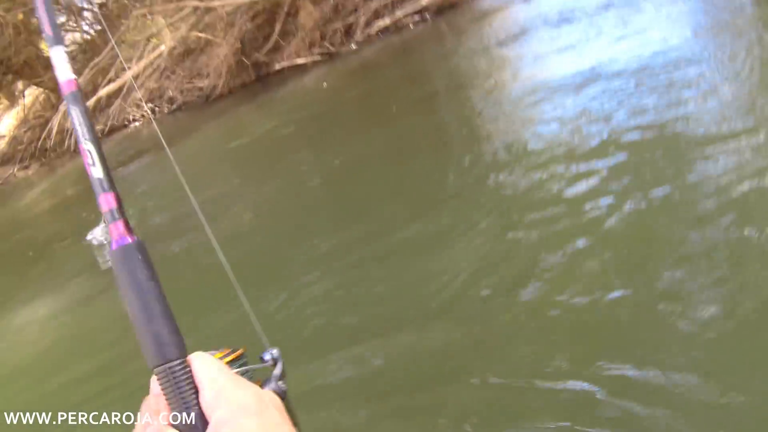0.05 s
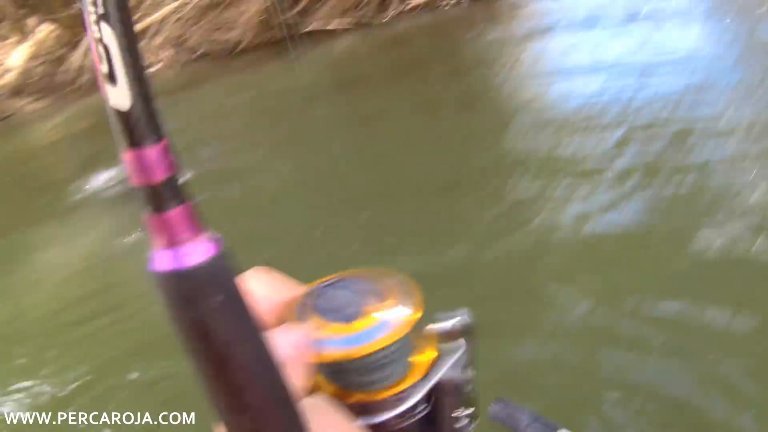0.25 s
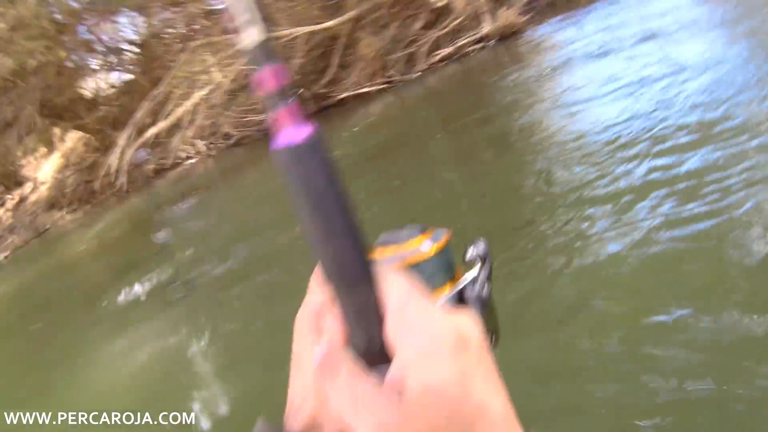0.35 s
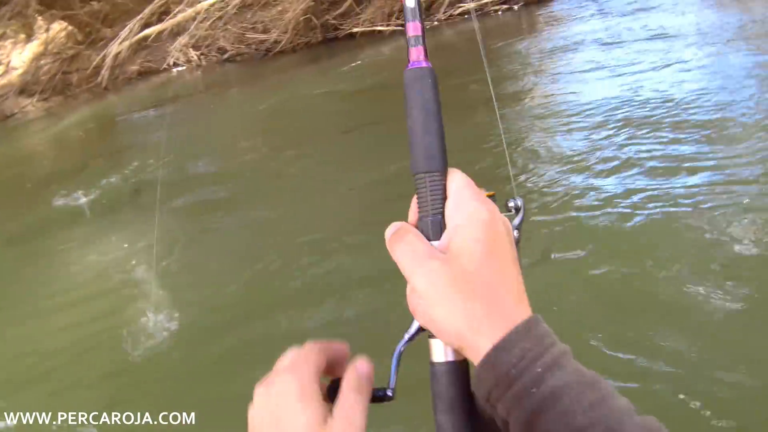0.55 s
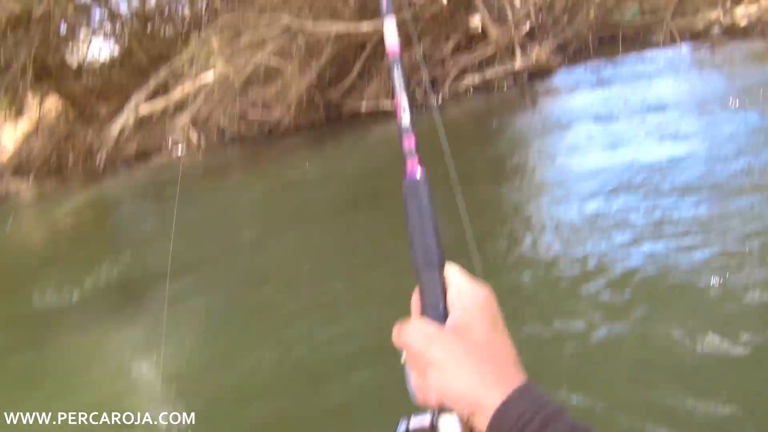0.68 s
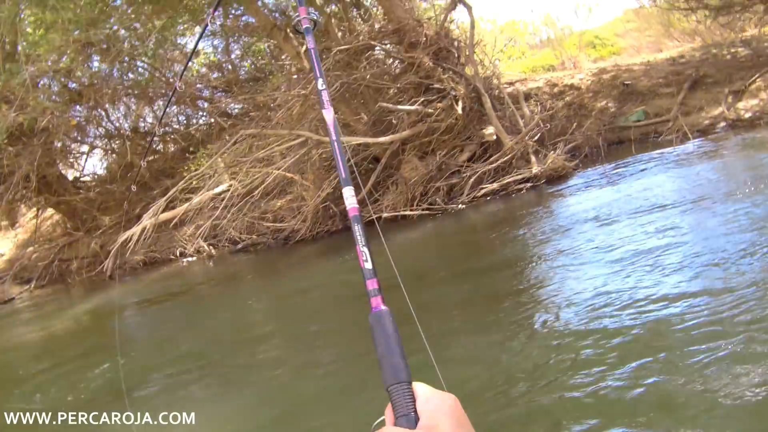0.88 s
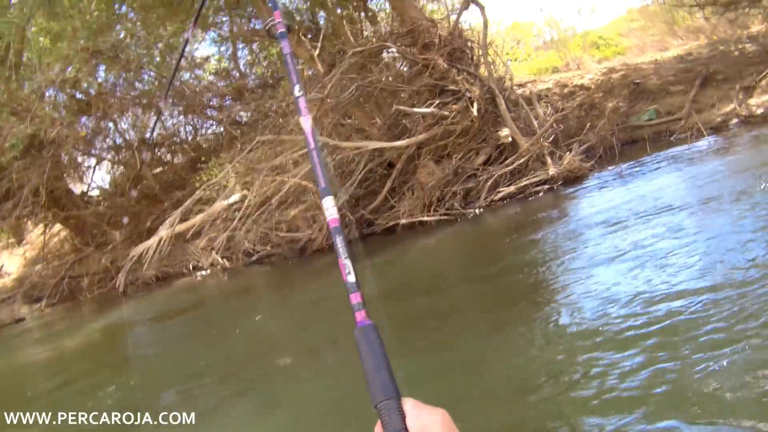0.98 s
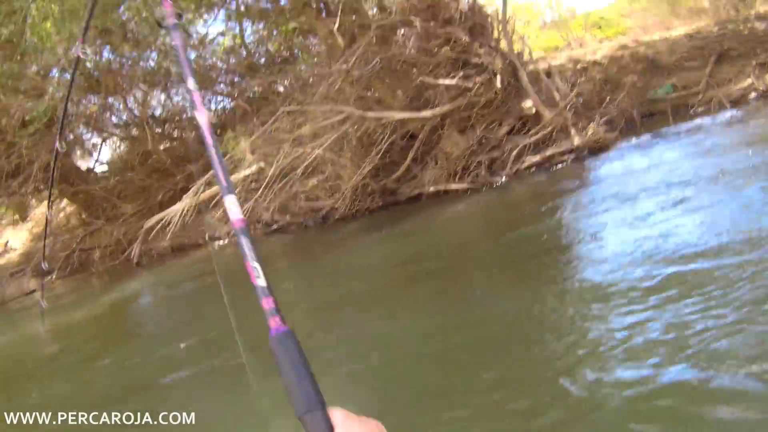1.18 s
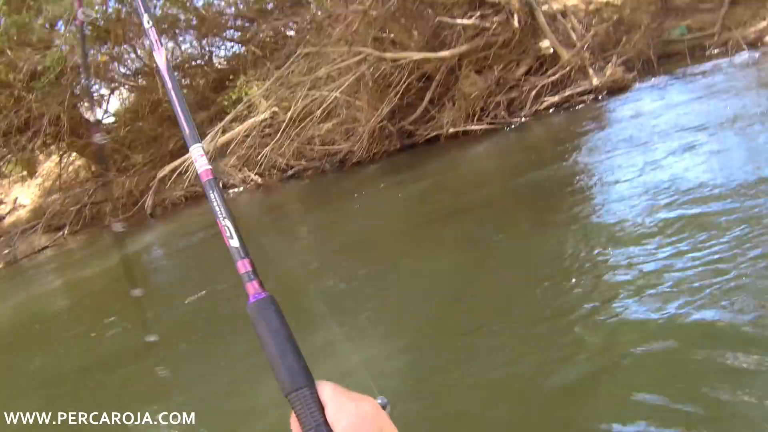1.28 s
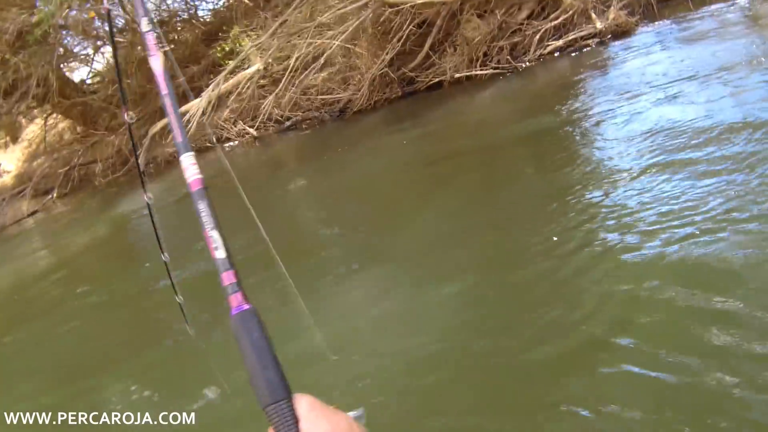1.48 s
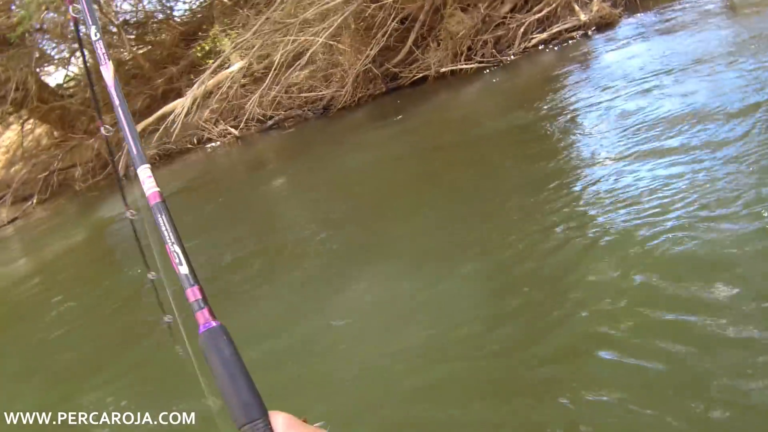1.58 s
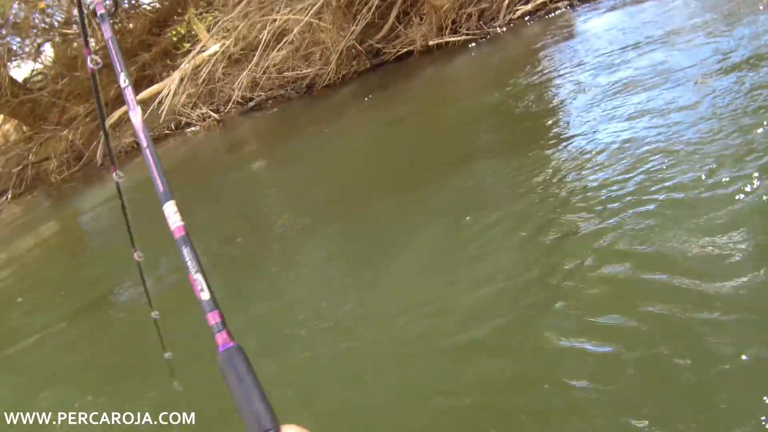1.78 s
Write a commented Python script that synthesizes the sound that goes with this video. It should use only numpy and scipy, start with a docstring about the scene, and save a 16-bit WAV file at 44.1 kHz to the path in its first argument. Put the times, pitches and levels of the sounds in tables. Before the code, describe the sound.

Close by on a river bank, a fishing rod cracks loudly and splinters. Much quieter clicks follow as the dangling tip knocks against the rod, ending with a dull handling bump, all over a soft hiss of water.

```python
"""A slow river hisses softly and a sleeve rustles as a bent fishing rod is raised, an arm's length from
the microphone of a small camera whose case rings near 5.7 kHz. A few fibres give, then the shaft cracks
and splinters; the water and the overgrown bank throw the crack back. The dangling tip clacks and ticks
against the rod, slack line scrapes, a steel guide pings and a hand bumps the grip."""
import sys
import numpy as np
from scipy import signal
from scipy.fft import rfft, irfft
from scipy.io import wavfile

SR = 44100
rng = np.random.default_rng(int(sys.argv[2]) if len(sys.argv) > 2 else 0)


def file_out(sig):
    """Save sig as 16-bit WAV at sys.argv[1]."""
    # one column per channel
    cols = np.atleast_2d(sig).T
    # limit, then scale
    lim = np.clip(cols, -1, 1)
    pcm = np.round(lim * 32767).astype(np.int16)
    wavfile.write(sys.argv[1], SR, pcm)


N = 81585

# river hiss heard through the camera case, which resonates near 5.7 kHz: f/Hz, relative level/dB
RIVER_IN_CASE = [(25, -4.5), (45, -8.5), (70, -7), (100, -11.5), (135, -13.5), (200, -14.5), (320, -12.5),
                 (550, -15.5), (800, -18), (1400, -20), (2100, -22), (3500, -27), (4300, -22.5),
                 (5100, -14.5), (5730, -10), (6500, -18.5), (7300, -27), (8600, -36), (11000, -42.5),
                 (16000, -59)]
RIVER_DB, RIPPLE_DB, RIPPLES_PER_S = -65, 1.2, 30
# air buffeting the moving camera: t/s, level/dB, half length/s
AIR_PUFFS = [(0.102, -59, 0.023), (0.323, -58, 0.078), (0.48, -64.5, 0.0193), (1.593, -64, 0.033),
             (1.681, -63.5, 0.053)]
# its rumble on the microphone: f/Hz, relative level/dB
WIND_COLOUR = [(20, 4), (90, -1), (150, -9), (300, -26), (1000, -50), (8000, -62.5)]

# sleeve and hand, close by: f/Hz, relative level/dB
RUSTLE_COLOUR = [(60, -12), (170, -10), (300, -5), (900, -1), (2000, -5.5), (4000, -14.5), (12000, -42.5)]
RUSTLE_DB, RUSTLE_HOLD_S, RUSTLE_FADE_S = -67, .274, .15
# the hand bumping the grip: t/s, level/dB, decay/s
GRIP_BUMPS = [(1.8186, -48.5, 0.0067), (1.8246, -37, 0.0032), (1.8310, -50.5, 0.01), (1.8393, -43, 0.0086),
              (1.8440, -43, .008)]
# the dull sound of a bump: f/Hz, relative level/dB
BUMP_COLOUR = [(30, -1), (80, 4.5), (200, -6), (380, -0.5), (750, -10.5), (1300, -22.5), (3000, -26),
               (10000, -56)]

# slack line sliding along the rod: t/s, level/dB, half length/s
LINE_SCRAPES = [(0.903, -72, 0.014), (0.948, -72, 0.0084), (1.195, -70, 0.013), (1.278, -71, 0.017),
                (1.446, -67.5, 0.017)]
SCRAPE_ROUGH_DB, CATCHES_PER_S = 4.5, 87
# taps on a steel line guide: t/s, level/dB
GUIDE_PINGS = [(1.4715, -54), (1.4918, -53)]
GUIDE_HZ, GUIDE_T60_S = 6320, .06

# tip, line and guides touching the rod: t/s, level/dB, decay/s, knock above tick/dB, knock f/Hz
CONTACTS = [(0.071, -57, 0.0027, 1, 1700), (0.148, -68.5, 0.0041, 5, 1900),
            (0.3461, -53.5, 0.0018, 9, 2300), (0.398, -58, 0.002, 5.5, 2820),
            (0.5703, -58.5, 0.0014, 2, 3200), (0.6974, -69, .003, 6, 2450), (0.854, -61.5, .002, 4, 3300),
            (0.8815, -65, 0.0038, 7, 1800), (0.8880, -47, 0.0023, -7, 3350),
            (0.8901, -35, 0.0021, -6, 3300), (0.8975, -50, 0.0055, -18, 1500),
            (0.9235, -50, 0.0016, -7, 5700), (0.9498, -53, 0.0016, -6, 4700),
            (1.2611, -54, 0.0023, 2, 3400), (1.2891, -66, 0.0031, 12, 2240),
            (1.4345, -48, 0.0026, -1.5, 2000), (1.4440, -63.5, .009, -0.5, 2200),
            (1.4490, -66.5, .004, 9, 4500), (1.4707, -53, 0.0022, -1, 2500), (1.4913, -64, .003, 2, 6310),
            (1.8141, -45.5, 0.0012, 5, 2900), (1.8310, -63, 0.0075, 2, 2520)]
# the bright part of a contact, through the case: f/Hz, relative level/dB
TICK_COLOUR = [(60, -36), (300, -15), (1200, -23), (2700, -14), (3260, -10.5), (3800, -24), (4400, -9.5),
               (4900, -4), (5700, 2), (6500, -6), (7300, -18), (8300, -18.5), (11000, -27), (14000, -48.5)]
TICK_RISE_S, TICK_ECHO_DB, TICK_ECHO_DECAY_S = .00048, -23, .025
# the rod when knocked or scraped: f/Hz, relative level/dB
KNOCK_COLOUR = [(60, -37), (300, -16), (1000, -12), (1700, 3), (2300, 0.5), (3400, -2), (4500, 3),
                (7000, -19), (14000, -47)]
KNOCK_Q, KNOCK_UNPITCHED_DB = 2.7, -2
# modes of the hollow tube, struck by the broken tip: f/Hz, level/dB, t60/s
TUBE_MODES = [(347, -61.5, 0.13), (1486, -58, .035), (2350, -55.5, 0.034), (3316, -46, 0.024),
              (4390, -38.5, 0.013), (5620, -31.5, 0.025), (6040, -54, .05), (8400, -46.5, 0.016)]
CLACK_S, TUBE_RISE_S = .8908, .00032

# dull, smeared reflection off the water and the near bank: f/Hz, relative level/dB
REFLECTION_COLOUR = [(100, -4.5), (300, -4), (580, 6.5), (900, -13.5), (2000, -2), (3500, -16), (8000, -35)]
REFLECTION_LAG_S, REFLECTION_DB, REFLECTION_DECAY_S = .027, -34, .01
# scatter from the branches along the bank, through the case: f/Hz, relative level/dB
BANK_COLOUR = [(60, 1), (170, -5.5), (280, 3), (600, -5.5), (900, -5), (2000, -5.5), (3000, -9),
               (4200, -6.5), (5700, 4), (7200, -10), (10000, -22), (15000, -47.5)]
BANK_DB, BANK_RISE_S, BANK_PATCHY_DB, BANK_PATCHES_PER_S = -33.5, .007, 1.5, 350
BANK_T60_LOW_S, BANK_T60_HIGH_S, BANK_SPLIT_HZ = .36, .3, 3500

# single fibres and splinters giving way: t/s, level/dB, decay/s
FIBRE_BREAKS = [(0.2090, -41.5, 0.001), (0.2148, -23.5, .0021), (0.2279, -23.5, 0.0021),
                (0.2370, -23, .002), (0.2461, -26, 0.0014), (0.2534, -38.5, 0.0021), (0.2880, -43, 0.0029),
                (0.38, -51, 0.0018)]
# a splinter's click, ringing through the camera case near 5.7 kHz: f/Hz, relative level/dB
SPLINTER_IN_CASE = [(150, -21.5), (1000, -19), (2500, -11), (4200, -10), (5000, 1.5), (5850, 9), (6600, -8),
                    (7600, -22), (11000, -27.5), (15000, -43.5)]
# the tube walls tearing at arm's length, through the case: f/Hz, relative level/dB
TEAR_COLOUR = [(50, -37), (170, -28), (350, -20.5), (480, -10.5), (650, -7), (850, -2), (1400, 0),
               (2100, -7), (3000, 1.5), (3900, 0), (4700, -6.5), (5600, 9.5), (6600, -4), (7400, -9.5),
               (10000, -17.5), (13000, -28.5), (15000, -18.5)]
SNAP_S, NEAR_WALL_DB, NEAR_WALL_DECAY_S = .2227, -8, .0023
FAR_WALL_LAG_S, FAR_WALL_DB, FAR_WALL_DECAY_S = .0036, -13.5, .0028
# modes of the breaking shaft: f/Hz, level/dB, t60/s
SHAFT_MODES = [(343.3, -23.5, 0.049), (649, -15, .04), (1232, -8.5, 0.02), (1427, -16, .018),
               (1640, -27, .03), (1980, -30, .035), (2780, -28.5, 0.023), (3335, -26.5, .03),
               (3690, -23.5, 0.035), (5415, -24, .036), (5860, -20, 0.056), (6290, -36, .07),
               (6655, -17, 0.026)]
# the recoil thumping the grip: f/Hz, level/dB, t60/s
RECOIL_MODES = [(83.8, -39.5, 0.12), (264.1, -44.5, .16), (423, -44, 0.15)]
RECOIL_LAG_S = .0057

CLIP_LEVEL, TOP_HZ = .35, 16000


def undb(db):
    """Decibels to gain."""
    return 10 ** (np.asarray(db) / 20)


def since(start):
    """Seconds since a moment, zero before it."""
    return np.maximum(np.arange(N) / SR - start, 0)


def die_away(t, t60):
    """A fade that loses 60 dB every t60 seconds."""
    return np.exp(-np.log(1000) * t / t60)


def noise():
    """White noise of level 1."""
    return rng.standard_normal(N)


def drift(per_s):
    """Smooth random drift with a spread near 1."""
    return np.interp(since(0) * per_s, np.arange(1024), rng.standard_normal(1024))


def swells(rows):
    """Bell-shaped rises in level."""
    return sum(undb(db) * np.exp(-.5 * ((since(0) - at) / half) ** 2) for at, db, half in rows)


def colour(x, points):
    """Causal filter through points of f/Hz, level/dB; white noise keeps its level."""
    size = 4096
    hz, db = np.array(points, float).T
    bin_hz = np.arange(size // 2 + 1) * SR / size
    gain = undb(np.interp(np.log(bin_hz + 1), np.log(hz), db))
    cepstrum = irfft(np.log(gain))
    cepstrum[1:size // 2] *= 2  # minimum phase: nothing sounds ahead of an attack
    cepstrum[size // 2 + 1:] = 0
    response = irfft(np.exp(rfft(cepstrum)))
    return signal.fftconvolve(x, response / np.linalg.norm(response))[:N]


def burst(start, db, decay, rise=1e-6):
    """A dense run of tiny clicks that builds up and fades, with no colour of its own."""
    size = 8192
    t = np.arange(1, size + 1) / SR
    fade = np.exp(-t / decay) * (1 - np.exp(-t / rise))
    clicks = rng.standard_normal(size) * fade
    for _ in range(4):  # flatten the spectrum while holding the clicks to the fade
        spectrum = rfft(clicks)
        flat = irfft(spectrum / (abs(spectrum) + 1e-12)) * np.linalg.norm(fade)
        clicks = np.clip(flat, -2 * fade, 2 * fade)
    return undb(db) * np.pad(clicks, (int(start * SR), N))[:N]


def ring(start, modes):
    """Damped modes set off at one moment; neighbours swing in opposite directions."""
    t = since(start)
    return sum((-1) ** k * undb(db) * np.sin(2 * np.pi * hz * t) * die_away(t, t60)
               for k, (hz, db, t60) in enumerate(modes))


def river():
    """Slow water nearby: a soft, faintly rippling hiss, heard through the resonant camera case."""
    return colour(noise(), RIVER_IN_CASE) * undb(RIVER_DB + RIPPLE_DB * drift(RIPPLES_PER_S))


def wind():
    """Low puffs of air on the microphone as the camera moves."""
    return swells(AIR_PUFFS) * colour(noise(), WIND_COLOUR)


def handling():
    """Close by, a sleeve rustles unevenly as the rod is raised; later the hand bumps the grip."""
    fade = np.exp(-since(RUSTLE_HOLD_S) / RUSTLE_FADE_S)
    rustle = colour(noise(), RUSTLE_COLOUR) * fade * undb(RUSTLE_DB + 2.5 * drift(per_s=45))
    bumps = sum(burst(*bump) for bump in GRIP_BUMPS)
    return rustle + colour(bumps, BUMP_COLOUR)


def line_scrape():
    """The slack line catches and slips along the shaft."""
    friction = noise() * swells(LINE_SCRAPES) * undb(SCRAPE_ROUGH_DB * drift(CATCHES_PER_S))
    return colour(friction, KNOCK_COLOUR)


def line_guide():
    """A small steel ring is tapped and pings."""
    return sum(ring(start, [(GUIDE_HZ, db, GUIDE_T60_S)]) for start, db in GUIDE_PINGS)


def knock(tap, hz):
    """The spot that is touched rings briefly at its own pitch."""
    b, a = signal.iirpeak(hz, KNOCK_Q, fs=SR)
    return signal.lfilter(b, a, signal.lfilter(b, a, tap)) / np.sqrt(b[0] / 2)


def dangling_tip():
    """Each contact is a bright tick, a faint echo and a knock; at the hardest, the tube rings too."""
    bright = dull = pitched = 0
    for start, db, decay, knock_db, hz in CONTACTS:
        bright += burst(start, db, decay, TICK_RISE_S)  # builds as line and guides slide together
        bright += burst(start, db + TICK_ECHO_DB, TICK_ECHO_DECAY_S)
        dull += burst(start, db + knock_db + KNOCK_UNPITCHED_DB, decay, TICK_RISE_S)
        pitched += knock(burst(start, db + knock_db, decay, TICK_RISE_S), hz)
    tube = ring(CLACK_S, TUBE_MODES) * (1 - np.exp(-since(CLACK_S) / TUBE_RISE_S))
    return colour(bright, TICK_COLOUR) + colour(dull, KNOCK_COLOUR) + pitched + tube


def bank_echo():
    """The crack comes back off the water and, unevenly, from countless branches; treble dies first."""
    t = since(SNAP_S)
    scatter = colour(noise() * undb(BANK_PATCHY_DB * drift(BANK_PATCHES_PER_S)), BANK_COLOUR)
    low = signal.sosfiltfilt(signal.butter(2, BANK_SPLIT_HZ, fs=SR, output="sos"), scatter)
    tail = low * die_away(t, BANK_T60_LOW_S) + (scatter - low) * die_away(t, BANK_T60_HIGH_S)
    branches = undb(BANK_DB) * tail * (1 - np.exp(-t / BANK_RISE_S))
    reflection = burst(SNAP_S + REFLECTION_LAG_S, REFLECTION_DB, REFLECTION_DECAY_S)
    return branches + colour(reflection, REFLECTION_COLOUR)


def rod_snap():
    """At arm's length, one wall tears, then the other, amid splinters; shaft rings, butt recoils."""
    near_wall = burst(SNAP_S, NEAR_WALL_DB, NEAR_WALL_DECAY_S)
    far_wall = burst(SNAP_S + FAR_WALL_LAG_S, FAR_WALL_DB, FAR_WALL_DECAY_S)
    tear = colour(near_wall + far_wall, TEAR_COLOUR)
    splinters = colour(sum(burst(*fibre) for fibre in FIBRE_BREAKS), SPLINTER_IN_CASE)
    shaft = ring(SNAP_S, SHAFT_MODES)
    recoil = ring(SNAP_S + RECOIL_LAG_S, RECOIL_MODES)
    return tear + splinters + shaft + recoil


def scene():
    """Everything as it reaches the single microphone on the river bank."""
    background = river() + wind()
    crack = rod_snap() + bank_echo()
    small_sounds = handling() + dangling_tip() + line_guide() + line_scrape()
    return (background + crack + small_sounds)[None, :]


def record(dry):
    """The camera's microphone flattens the peaks of the close crack, and the top is cut."""
    clipped = dry / (1 + (dry / CLIP_LEVEL) ** 6) ** (1 / 6)
    top_cut = signal.ellip(8, .2, 70, TOP_HZ, fs=SR, output="sos")
    return signal.sosfilt(top_cut, clipped)


dry = scene()
out = record(dry)
file_out(out)
```